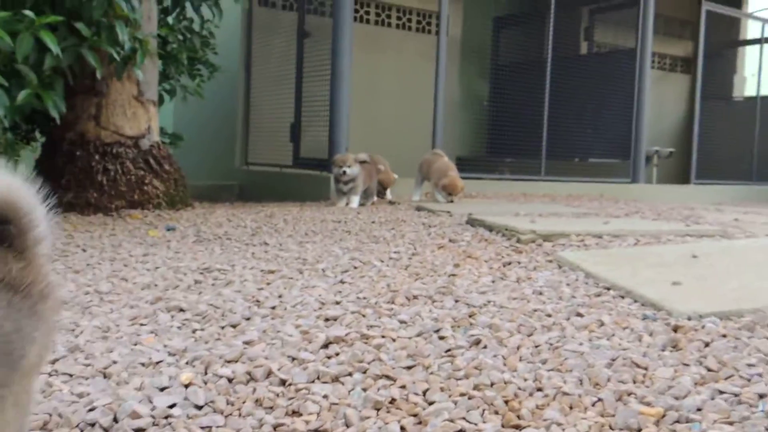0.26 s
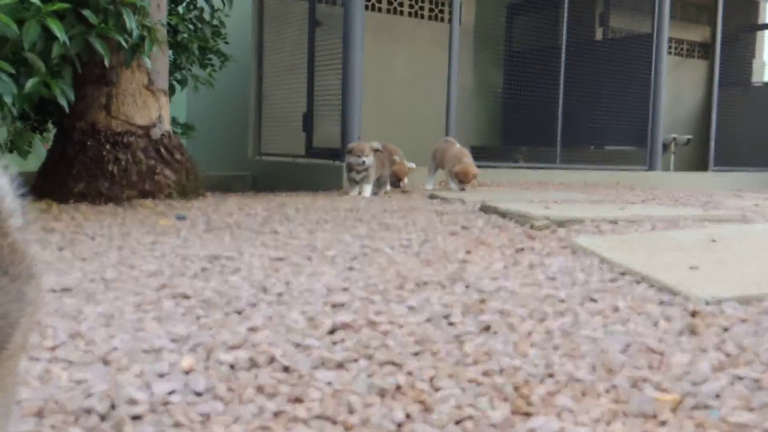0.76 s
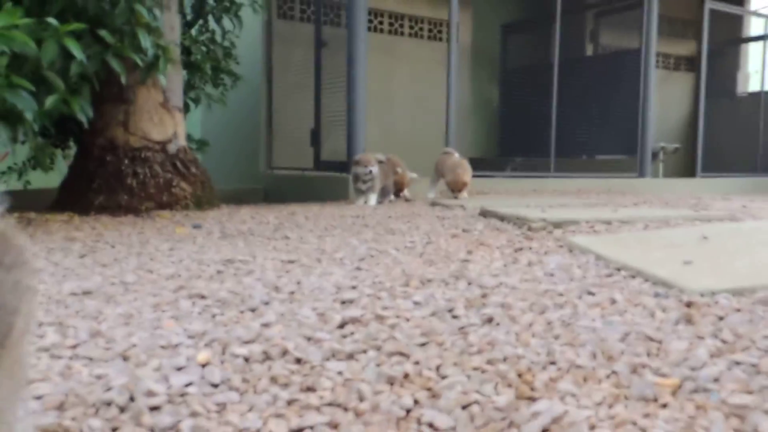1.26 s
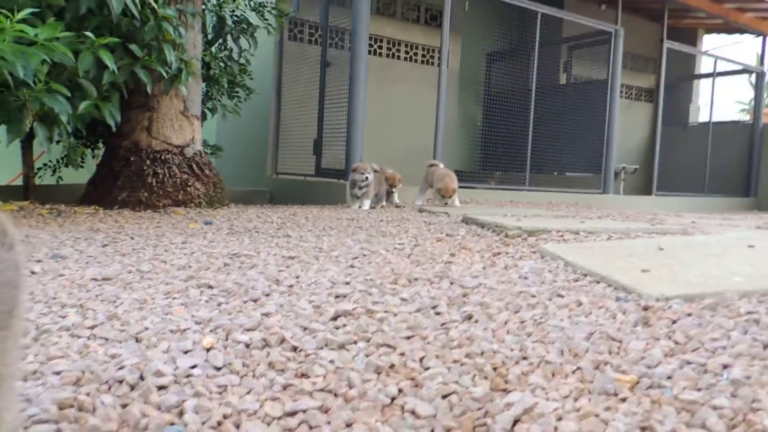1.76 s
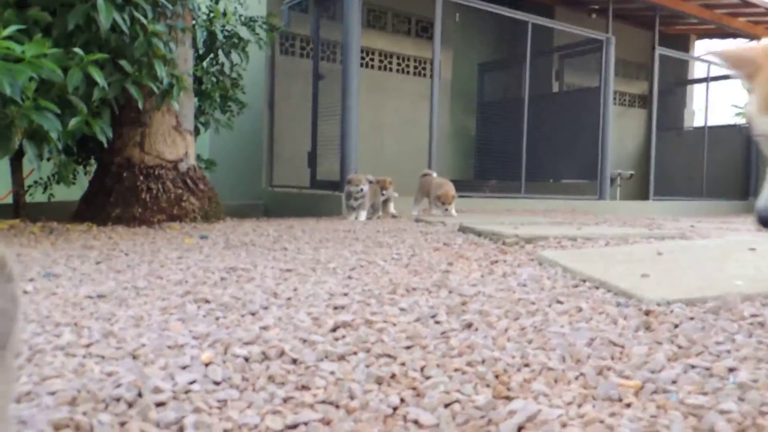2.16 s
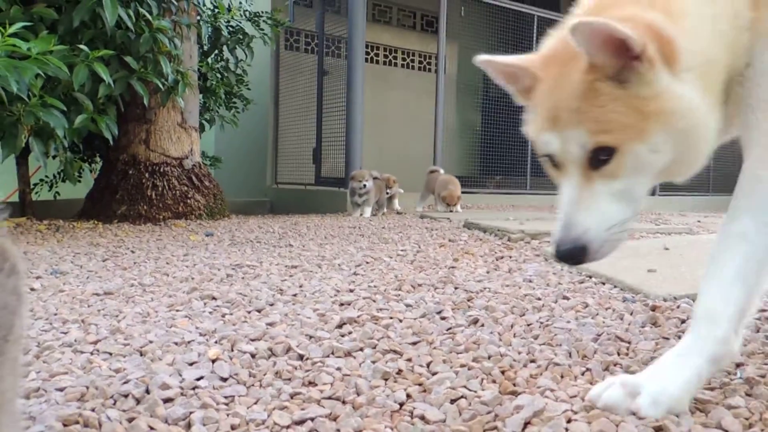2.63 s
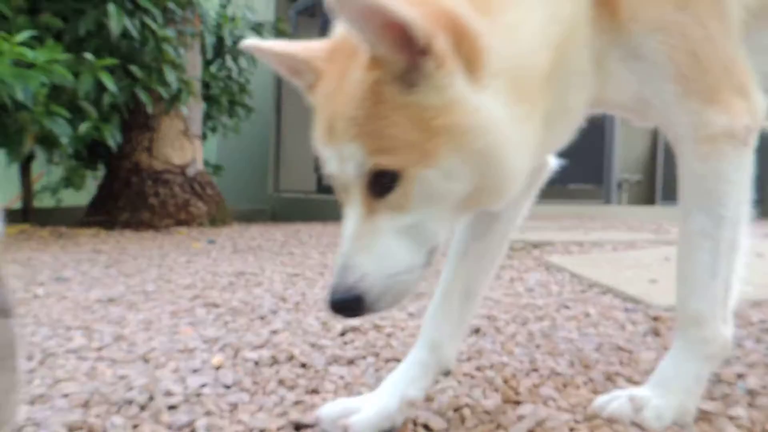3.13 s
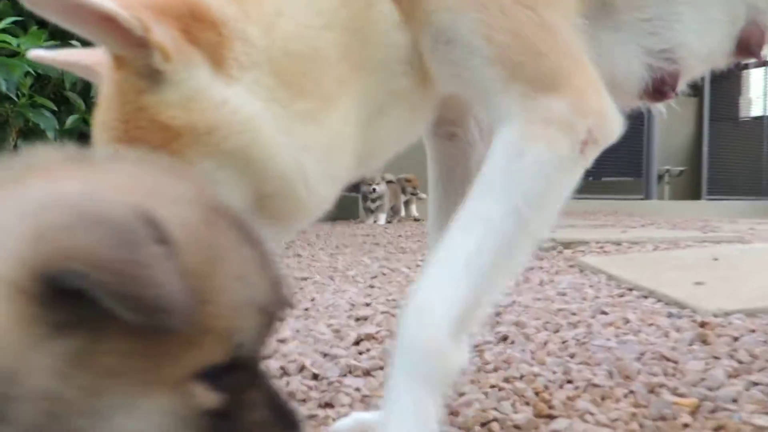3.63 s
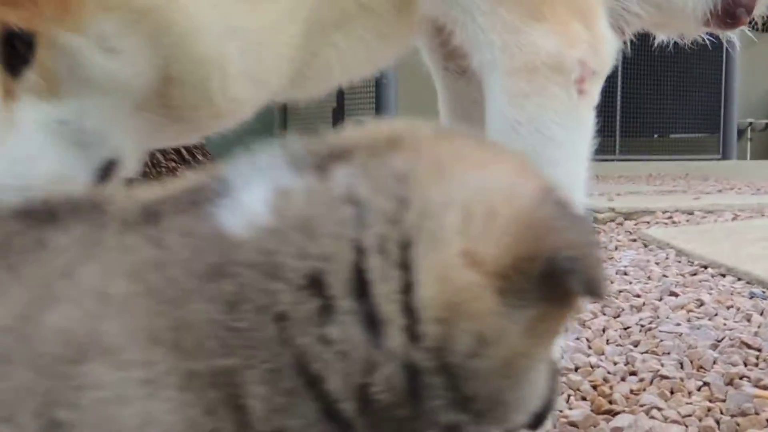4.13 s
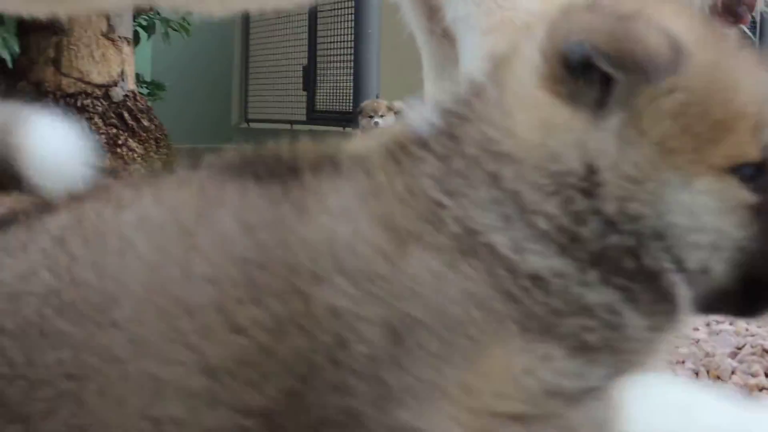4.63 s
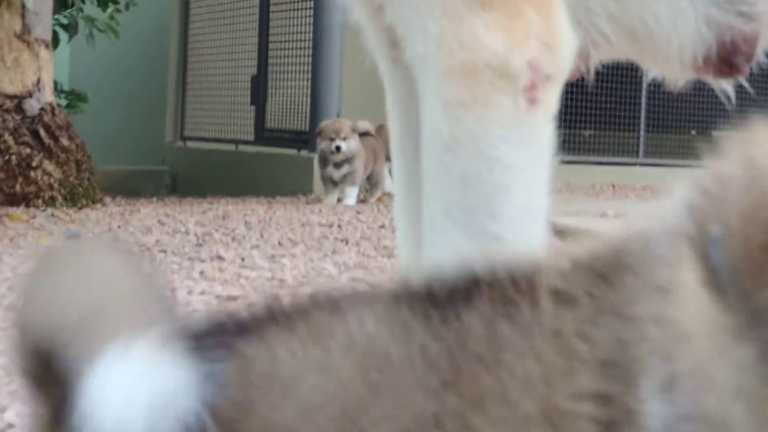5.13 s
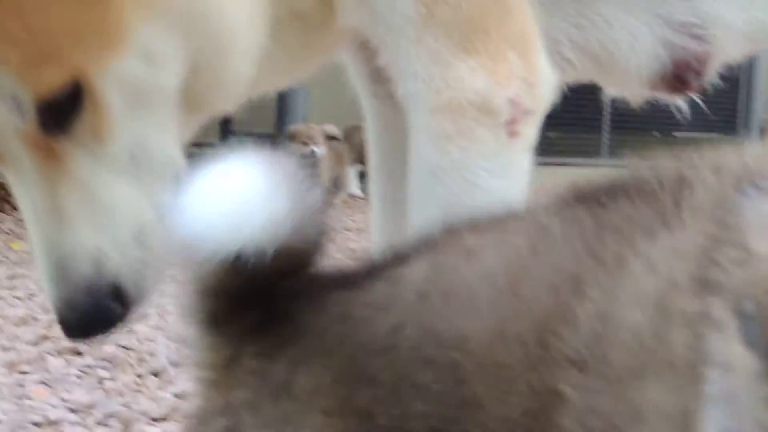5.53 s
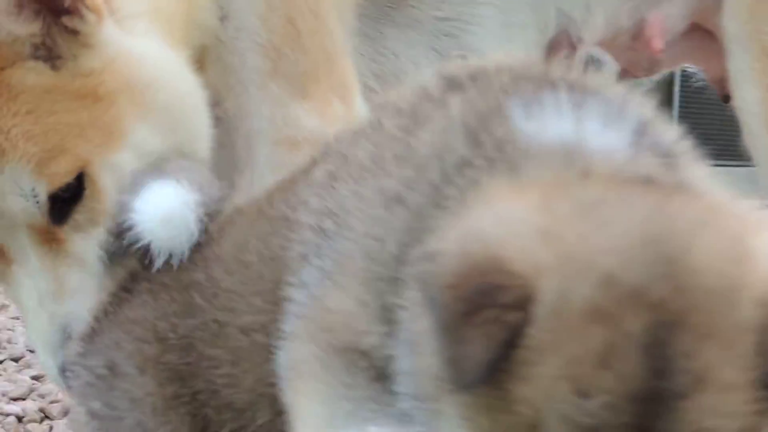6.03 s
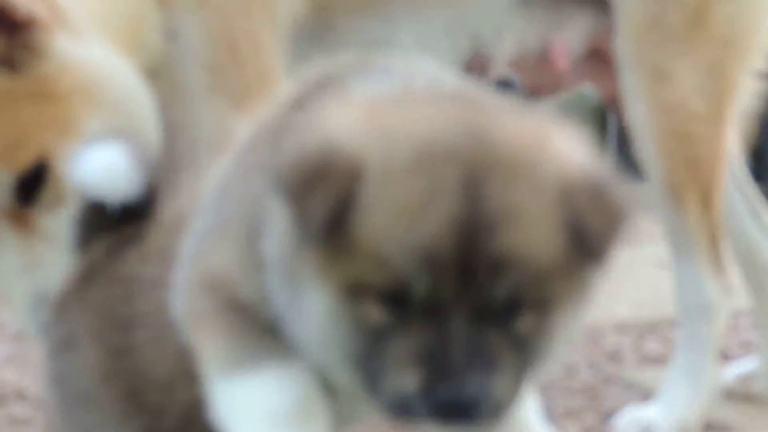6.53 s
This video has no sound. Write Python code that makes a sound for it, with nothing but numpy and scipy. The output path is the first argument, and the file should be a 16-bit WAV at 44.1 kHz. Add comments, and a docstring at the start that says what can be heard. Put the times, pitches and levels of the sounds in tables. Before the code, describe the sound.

A walled outdoor yard, heard in stereo from ground level. At first there is low machine hum, quiet air, soft fur brushing and a faint gravel step at 0.45 s. A small bird's two-note chirp, about 5 kHz, comes at 0.3 s and recurs throughout, echoing briefly, with fainter falling slurs. From 1.5 s paws crunch close gravel, firm at 1.6 and 2.1 s; a dry, multiple-contact stone snap cracks at 1.83 s. A faint hollow drone swells around 2.55 s, near more crunches at 2.65 s. The busiest treading runs 3.2-3.8 s, slightly left, with bright pebble clicks. A faint whirr lingers about 3.8-5.2 s, with thin very high whistles from 4 s. Light steps come around 4.4 and 5.1 s. Fur rushes past at 5.5-6.2 s over shifting grit; a pebble knocks at 6.46 s, and faint whistles and hum continue to the end near 6.8 s.

```python
"""A brush of fur and a low outdoor hum come first, then a small bird's two-note call from farther off.
Soon a dog and her puppies walk the loose gravel of a walled kennel yard, close to microphones on the ground.
Paws crunch as bursts of tiny stone contacts; pebbles and one hard snap ring in short-lived modes.
Two-voiced gliding tones make the chirps, and a decaying noise tail echoes them round the walls.
Filtered noise makes the fur, air and machine hum."""
import sys
import numpy as np
from scipy import signal
from scipy.fft import rfft, irfft, next_fast_len
from scipy.io import wavfile
from scipy.ndimage import map_coordinates

SR = 44100
rng = np.random.default_rng(int(sys.argv[2]) if len(sys.argv) > 2 else 0)


def waveform_to_disk(signal):
    """Save audio, clipped to [-1, 1], as 16-bit WAV at the path in sys.argv[1]."""
    frames = np.transpose(np.atleast_2d(signal))
    scaled = np.clip(frames, -1, 1) * 32767
    samples = np.round(scaled).astype(np.int16)
    wavfile.write(sys.argv[1], SR, samples)


N = 298998

# Paws on close gravel: full weight at [t/s], crunch [level/dB], loading time [t/s], grind over crunch [level/dB]
STEPS = [(.451, -33, 0.01, -13), (1.545, -38, 0.044, -13), (1.622, -22.5, 0.013, -17.5),
         (2.094, -19.5, 0.0033, -14.5), (2.234, -31, 0.0021, -23), (2.571, -37, .013, -18),
         (2.657, -28, 0.0054, -9), (2.675, -22.5, 0.0064, -11), (3.214, -25, 0.0057, -14.5),
         (3.295, -25, .003, -16.5), (3.369, -18.5, 0.006, -27), (3.425, -33.5, 0.013, -8.5),
         (3.486, -26, 0.0056, -25), (3.602, -35, 0.0095, -11.5), (3.811, -28.5, .014, -12),
         (4.368, -34, 0.027, -9.5), (4.497, -39, .01, -7), (5.097, -36.5, .014, -11.5),
         (5.153, -37.5, .0045, -8), (5.205, -40.5, 0.01, -11)]
# Where the paws tread: [t/s], left over right [level/dB]
PAW_SIDE = [(1.5, 1), (2.2, 0), (2.7, 0.5), (3.4, 1), (3.7, 3)]
# Spectrum of the crunch: [f/Hz], [relative level/dB]
CRUNCH_SPECTRUM = [(300, -30), (1500, -18), (3000, -14), (5000, -8), (7000, -2), (9500, 0), (14000, 1)]
# Spectrum of the lower grinding: [f/Hz], [relative level/dB]
GRIND_SPECTRUM = [(100, -33), (300, -3), (650, -2.5), (1300, -8.5), (2800, -1.5), (5000, -11), (9000, -42)]
# Single pebbles knocking: [t/s], direct attack [level/dB], centre of the modes [f/Hz], left over right [level/dB]
PEBBLES = [(0.718, -47, 9150, 7), (0.852, -46, 3200, -1), (1.609, -36, 9300, -8), (2.077, -40, 2610, -3),
           (2.0834, -39, 4170, -7), (2.0914, -31, 8330, -7), (2.2301, -41.5, 7500, -8),
           (2.3267, -44.5, 2090, 1), (2.3773, -44, 1810, 0), (2.408, -46.5, 9000, -6),
           (2.5226, -32, 5050, 3), (2.6472, -37.5, 9000, 0), (2.7738, -36, 7770, -2),
           (2.957, -44, 6000, -3), (3.341, -44, 10000, 4), (3.3658, -34, 9500, -5),
           (3.479, -33.5, 10000, -6), (3.4857, -34, 8670, -2), (3.6254, -40, 10100, 8),
           (3.777, -40.5, 6800, -1), (4.4688, -45, 7500, -3), (4.851, -43, 7800, -8),
           (6.4614, -37.5, 3940, -3)]
# Quick contacts of one hard stone beside the microphones: [t/s], [relative peak level/dB]
SNAP_CONTACTS = [(1.834, -4.5), (1.8346, -5.5), (1.8356, -7.5), (1.8368, -14.5)]
# What the snapping stone rings with: [f/Hz], [relative level/dB], t60 [t/s]
SNAP_MODES = [(1220, -14, 0.019), (2085, -3.5, 0.013), (2790, -3, 0.018), (3420, -4.5, 0.011),
              (5100, 1, 0.007), (6000, 0.5, 0.005), (7700, 1, 0.01), (8600, -8, 0.017),
              (10900, -15, 0.0081), (13600, -18, 0.0087)]
# Small stones shifting under the puppies: [t/s], [level/dB]
SHUFFLE_LEVEL = [(0, -54), (.38, -45.5), (.8, -64.5), (1.1, -51.5), (1.45, -55), (1.8, -47.5), (2.5, -63),
                 (2.7, -47.5), (3, -53.5), (3.3, -47), (3.6, -52.5), (5.05, -54), (5.3, -60.5), (5.85, -47),
                 (6.4, -59.5), (6.78, -52.5)]
# Spectrum of the shifting grit: [f/Hz], [relative level/dB]
GRIT_SPECTRUM = [(300, -28), (2000, -5.5), (4000, 3), (7000, 2), (11000, 0), (14000, -2)]
# Fur brushing past the microphones: [t/s], [level/dB]
FUR_LEVEL = [(0, -52), (.45, -53), (.7, -58.5), (3, -56), (3.8, -53.5), (5, -53), (5.33, -56),
             (5.48, -48.5), (5.9, -46), (6.2, -50), (6.4, -57.5), (6.78, -54.5)]
# Spectrum of the coat's rush: [f/Hz], [relative level/dB]
COAT_SPECTRUM = [(60, -11.5), (250, 5), (500, 1), (1100, 2), (1800, 0.5), (2600, -9.5), (4500, -16),
                 (8000, -11), (14000, -26)]
# Near bird's two-note call: [t/s], nominal top [f/Hz], [relative level/dB], direct [relative level/dB],
# wait for the second note [t/s], second over first note [level/dB], overtone [relative level/dB]
CHIRPS = [(.27, 4976, -33.5, -2, 0.096, 1, -9), (.763, 5090, -48, 2.5, 0.095, -1, -12),
          (1.018, 5120, -35, 1.5, .097, 1, -12), (1.474, 5130, -41, 4.5, 0.098, -6, -12),
          (2.187, 5110, -44.5, 3, .097, -1, -12), (2.758, 5160, -41, -6, .085, -4, -12),
          (3.502, 5070, -39.5, -4, .09, -7.5, -12), (4.592, 5100, -37.5, -7, 0.1, -10, -9),
          (5.565, 4935, -42.5, -6, 0.077, -0.5, -9), (5.762, 5170, -48.5, 0, 0.089, 1, 6),
          (6.205, 5200, -46, 3, .1, -8, 7)]
# Farther bird's falling slurs: [t/s], nominal top [f/Hz], [relative level/dB]
SLURS = [(1.256, 4440, -45.5), (1.326, 4110, -51.5), (2.96, 4400, -50.5), (4.155, 4590, -48.5),
         (6.518, 4640, -47.5), (6.585, 4200, -50)]
# Thin high whistles: [t/s], length [t/s], nominal start [f/Hz], nominal end [f/Hz], [relative level/dB]
WHISTLES = [(4.05, .07, 10900, 11550, -58), (4.14, 0.13, 11700, 11300, -62), (4.55, .14, 13300, 12400, -57),
            (4.753, 0.095, 12700, 12200, -50), (6.58, .11, 12300, 14200, -51),
            (6.734, .035, 12500, 12800, -50)]
# Reverberation between the walls: [f/Hz], t60 [t/s]
YARD_T60 = [(300, 0.3), (4500, 0.4), (9000, 0.16), (14000, 0.069)]
# Distant machinery: centre [f/Hz], half-amplitude width [f/Hz], [level/dB]
HUM_BANDS = [(36, 14, -61.5), (69.8, 13.6, -62.5), (153.5, 34, -68), (274, 29, -64.5)]
# A faint narrow whirr: [t/s], [level/dB]
WHIRR_LEVEL = [(0, -74), (3.4, -69), (3.8, -60.5), (5.2, -60), (6.78, -77)]
# A brief hollow drone far off: [t/s], [level/dB]
DRONE_LEVEL = [(2.25, -60), (2.38, -55), (2.56, -46), (2.68, -53), (2.8, -65)]
# Spectrum of the drone: [f/Hz], [relative level/dB]
HOLLOW_SPECTRUM = [(300, -11), (550, -9.5), (680, 0), (780, -15), (880, -4), (1050, -18), (1600, -78)]
# Spectrum of the steady air: [f/Hz], [relative level/dB]
AIR_SPECTRUM = [(12, -38), (22, -9), (54, -5), (110, -3.5), (200, -6), (330, -6.5), (550, -11), (800, -9),
                (1200, -13), (2300, -15.5), (3700, -11.5), (4600, -18), (8000, -21), (14000, -23)]
# Likeness of diffuse noise at the two microphones: [f/Hz], correlation [-1 to 1]
LIKENESS = [(30, 0.84), (120, 0.79), (500, 0.67), (1200, 0.28), (3000, 0), (12000, 0.066)]

TOP_HZ = 14300  # upper band limit at the microphones
RELEASE = 1.5  # a paw's crunch dies away this much slower than it builds
SETTLE_DB, SETTLE_S = -14, 0.067  # stones settling after each step, decay time constant in s
# t60 in s of a pebble of this pitch; bigger, lower stones ring longer
RING_S, RING_AT_HZ, RING_SLOPE = 0.014, 8150, 0.69
ATTACK_S = .006  # span over which a pebble's attack level counts
# The call's high arch and lower, shorter answer: length/s, ratio to nominal top, sweep share, place of top 0-1
ARCH, ANSWER = (.068, 1.005, .24, .42), (.045, .88, .25, .68)
SLUR_S, SLUR_SWEEP, SLUR_APEX = .07, .17, 0.198  # every slur tops early and falls
SLUR_DIRECT_DB, SLUR_OVERTONE_DB = -8, -15  # heard mostly as echo
ROUNDNESS = 1.65  # shape of an arch's top: 1 pointed, 2 round
# Hair-tip hiss at this level of brushing; it grows faster than the rush
HAIR_DB, HAIR_AT_DB, HAIR_GROWS = -51.5, -47, 1.94


def paws():
    """Each paw loads the close gravel, which crunches, grinds lower down and then settles."""
    t = np.arange(N) / SR
    crunch_power, grind_power = np.zeros((2, N)), np.zeros((2, N))
    for s, db, rise, grind_db in STEPS:
        before, after = np.maximum(s - t, 0), np.maximum(t - s, 0)
        load = np.exp(-np.minimum(before / rise, 20))
        press = load * np.exp(-np.minimum(after / (RELEASE * rise), 20))
        settle = amp(SETTLE_DB) * load * np.exp(-after / SETTLE_S)
        power = panned(db, np.interp(s, *np.transpose(PAW_SIDE))) ** 2
        crunch_power += power * (press ** 2 + settle ** 2)
        grind_power += power * (amp(grind_db) * press) ** 2
    contacts = stony(grains(rate=1300, spread_db=5.5, shared=0.42), ring_db=-4.0, t60=0.011)
    crunch = np.sqrt(crunch_power) * coloured(contacts, CRUNCH_SPECTRUM)
    low_contacts = grains(rate=2200, spread_db=5.0, shared=0.64)
    return crunch + np.sqrt(grind_power) * coloured(low_contacts, GRIND_SPECTRUM)


def pebbles():
    """Every pebble cracks, then rings in scattered short-lived modes, heard differently at each microphone."""
    out, t = np.zeros((2, N)), np.arange(SR // 20) / SR
    for s, db, hz, pan_db in PEBBLES:
        t60 = RING_S * (RING_AT_HZ / hz) ** RING_SLOPE
        modes = hz * np.exp(0.539 * rng.standard_normal(size=(60, 1)))
        common = rng.standard_normal(size=(60, 1))
        strength = common + 1.06 * rng.standard_normal(size=(2, 60, 1))
        tones = strength * (modes < TOP_HZ) * np.sin(2 * np.pi * modes * t)
        ring = tones.sum(axis=1) * amp(-60 * t / t60)
        crack = 7 * amp(-60 * t / 0.0033) * rng.standard_normal(len(t))
        blow = ring + crack
        attack = blow[:, :int(ATTACK_S * SR)].std(axis=1, keepdims=True)
        add(out, s, panned(db, pan_db) * blow / attack)
    return out


def snap():
    """A stone slips and strikes several times within milliseconds: a broad crack and a very short ring."""
    out, t = np.zeros((2, N)), np.arange(SR // 20) / SR
    for s, db in SNAP_CONTACTS:
        ring = np.zeros((2, len(t)))
        for hz, mode_db, t60 in SNAP_MODES:
            phase = 2 * np.pi * (hz * t + rng.random((2, 1)))
            ring += amp(mode_db - 60 * t / t60) * np.sin(phase)
        crack = 1.5 * amp(-60 * t / .006) * rng.standard_normal((2, len(t)))
        blow = ring + crack
        add(out, s, amp(db) * blow / np.abs(blow).max(axis=1, keepdims=True))
    # so small a stone radiates almost no bass
    high_pass = signal.butter(2, 550, "high", fs=SR, output="sos")
    return amp(2.5) * signal.sosfilt(high_pass, out)


def shuffle():
    """Sparse faint stone contacts tick on a fine, unsteady hiss of shifting grit."""
    contacts = stony(grains(rate=83, spread_db=9, shared=0.38), ring_db=2, t60=0.016)
    ticks = coloured(contacts, GRIT_SPECTRUM)
    hiss = amp(2 * wobble(30)) * coloured(diffuse(), GRIT_SPECTRUM)
    return level(SHUFFLE_LEVEL) * (amp(-5.0) * ticks + hiss)


def grains(rate, spread_db, shared):
    """Tiny stone contacts, rate a second, of random size; the shared part reaches the right microphone first."""
    ticks = (rng.random((3, N)) < rate / SR) * rng.choice([-1, 1], (3, N))
    ticks = ticks * amp(spread_db * np.clip(rng.standard_normal((3, N)), -2, 2))
    direct = np.array([np.roll(ticks[2], 5), ticks[2]])  # 5 samples late on the left
    return np.sqrt(shared) * direct + np.sqrt(1 - shared) * ticks[:2]


def stony(x, ring_db, t60):
    """Touching pebbles ring briefly in modes so dense that decaying noise stands for them."""
    t = np.arange(SR // 30) / SR
    ring = rng.standard_normal((2, len(t))) * amp(-60 * t / t60)
    ring = ring / np.linalg.norm(ring[0])
    return x + amp(ring_db) * signal.fftconvolve(x, ring, axes=1)[:, :N]


def fur():
    """The coat sweeps past the microphones in a soft rush; harder brushing makes its hair tips hiss more."""
    brushing = level(FUR_LEVEL)
    rush = brushing * amp(1.43 * wobble(18)) * coloured(diffuse(), COAT_SPECTRUM)
    hiss = amp(HAIR_DB) * (brushing / amp(HAIR_AT_DB)) ** HAIR_GROWS
    tips = hiss * amp(1.5 * wobble(16)) * narrow(hz=11800, width=3600)
    return rush + tips


def birds():
    """Both sides of each syrinx sing the same arch, the second a little higher, direct and off the walls."""
    song, direct = np.zeros(N), np.zeros(N)
    waver, flutter = .007 * wobble(260), amp(1.5 * wobble(120))  # of pitch, of loudness
    for s, length, top_hz, sweep, apex, db, direct_db, overtone_db in notes():
        u = np.linspace(0, 1, int(length * SR))
        now = slice(int(s * SR), int(s * SR) + len(u))
        off_top = np.where(u < apex, (apex - u) / apex, (u - apex) / (1 - apex))
        hz = top_hz * (1 - sweep * off_top ** ROUNDNESS + waver[now])
        phase = 2 * np.pi * np.cumsum(hz) / SR
        swell = np.abs(np.sin(np.pi * u))
        # the upper voice swells mid-note and is stronger in wider sweeps
        upper = amp(-0.5) * sweep / 0.36 * swell ** 2
        upper_phase = 1.135 * phase
        voices = np.sqrt(swell) * np.sin(phase) + upper * np.sin(upper_phase)
        # the two voices modulate each other
        sum_tone = amp(overtone_db) * upper * np.sin(phase + upper_phase)
        note = amp(db) * flutter[now] * (voices + sum_tone)
        add(song, s, note)
        add(direct, s, amp(direct_db) * note)
    direct_pair = np.array([np.roll(direct, 2), direct])  # 2 samples late on the left
    return amp(-2) * direct_pair + amp(-2.5) * yard(song, early_db=-22)


def notes():
    """Near calls as arch and answer, then far slurs, each with its pitch shape and levels."""
    for s, top_hz, db, direct_db, wait_s, answer_db, overtone_db in CHIRPS:
        pair = (s, db, ARCH), (s + wait_s, db + answer_db, ANSWER)
        for start, note_db, (length, ratio, sweep, apex) in pair:
            yield start, length, ratio * top_hz, sweep, apex, note_db, direct_db, overtone_db
    for s, top_hz, db in SLURS:
        yield s, SLUR_S, top_hz, SLUR_SWEEP, SLUR_APEX, db, SLUR_DIRECT_DB, SLUR_OVERTONE_DB


def whistles():
    """Very high, faint, unsteady gliding tones, partly echoed by the yard."""
    out = np.zeros(N)
    for s, length, start_hz, end_hz, db in WHISTLES:
        u = np.linspace(0, 1, int(length * SR))
        glide = start_hz + (end_hz - start_hz) * u
        hz = glide * (1 + .004 * wobble(91)[:len(u)])
        add(out, s, amp(db) * np.sin(np.pi * u) * np.sin(2 * np.pi * np.cumsum(hz) / SR))
    return amp(-6.5) * out + amp(-12) * yard(out, early_db=-14)


def yard(x, early_db):
    """Walls give a few early echoes and a tail of decaying noise whose treble dies first."""
    hz, t, noise = signal.stft(rng.standard_normal((2, SR)), SR, nperseg=256)
    decay = amp(-60 * t / along(YARD_T60, hz)[:, None])
    tail = signal.istft(noise * decay, SR, nperseg=256)[1]
    tail = tail / np.linalg.norm(tail[0])
    for side in tail:
        side[(SR * rng.uniform(.003, .035, size=6)).astype(int)] += amp(early_db)
    return signal.fftconvolve(np.atleast_2d(x), tail, axes=1)[:, :N]


def outdoors():
    """Steady air as diffuse noise, machine hum as a deep tone and narrow bands, a whirr and a far drone."""
    air = amp(-50.5) * coloured(diffuse(), AIR_SPECTRUM)
    deep_level = amp(-54.5 + 2.3 * wobble(7.7))
    deep = deep_level * np.sin(2 * np.pi * 37.6 * np.arange(N) / SR + 1.16 * wobble(8.6))
    hum = sum(amp(db) * narrow(hz, width) for hz, width, db in HUM_BANDS)
    whirr = level(WHIRR_LEVEL) * narrow(hz=1178, width=130)
    drone = level(DRONE_LEVEL) * coloured(diffuse(), HOLLOW_SPECTRUM)
    return air + deep + hum + whirr + drone


def diffuse():
    """White stereo noise from all round, most alike at the two microphones in the bass."""
    def mid_side(hz):
        turn = np.arccos(np.clip(along(LIKENESS, hz), -1, 1)) / 2
        return np.array([np.cos(turn), np.sin(turn)])

    mid, side = filtered(rng.standard_normal((2, N)), mid_side)
    return np.array([mid + side, mid - side])


def narrow(hz, width):
    """Stereo noise of rms 1 in one resonance."""
    return unit(filtered(diffuse(), lambda f: 1 / (1 + ((f - hz) / (width / 2)) ** 2)))


def coloured(x, spectrum):
    """x with the given spectrum, at rms 1."""
    return unit(filtered(x, lambda hz: amp(along(spectrum, hz))))


def filtered(x, response):
    """x times a response of frequency."""
    m = next_fast_len(N + SR // 2)
    return irfft(rfft(x, m) * response(np.fft.rfftfreq(m, 1 / SR)), m)[..., :N]


def wobble(rate):
    """A smooth random curve with rate knots a second."""
    return map_coordinates(rng.standard_normal(N // 100), [np.arange(N) * rate / SR], mode="wrap")


def amp(db):
    """Decibels to gain."""
    return 10 ** (np.asarray(db) / 20)


def panned(db, pan_db):
    """Left and right gains, pan_db apart, around a level."""
    return amp(db + np.array([[pan_db], [-pan_db]]) / 2)


def unit(x):
    """Scale to rms 1."""
    return x / np.sqrt(np.mean(x ** 2) + 1e-20)


def along(points, hz):
    """(f/Hz, value) points read on a log frequency axis."""
    f, v = np.transpose(points)
    return np.interp(np.log(hz + 1), np.log(f + 1), v)


def level(rows):
    """Gain per sample from (t/s, level/dB) rows."""
    return amp(np.interp(np.arange(N) / SR, *np.transpose(rows)))


def add(track, s, sound):
    """Mix a sound into a track at time s."""
    part = track[..., max(round(s * SR), 0):][..., :sound.shape[-1]]
    part += sound[..., :part.shape[-1]]


def scene():
    """Close gravel is fairly dry; the birds are far off and ring round the yard."""
    gravel = paws() + pebbles()
    ground = gravel + amp(-10.0) * yard(gravel, early_db=-30.0) + snap() + shuffle()
    return ground + fur() + birds() + whistles() + outdoors()


def record(dry):
    """The microphones' sound ends steeply at the upper band limit."""
    return filtered(dry, lambda hz: 1 / np.sqrt(1 + (hz / TOP_HZ) ** 400))


dry = scene()
out = record(dry)
waveform_to_disk(out)
```